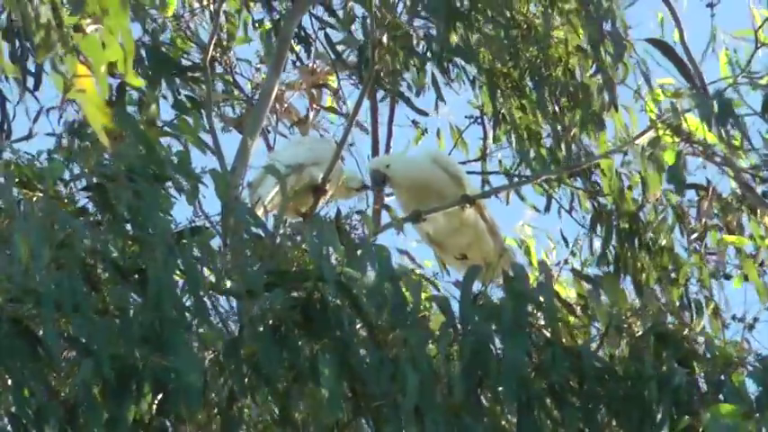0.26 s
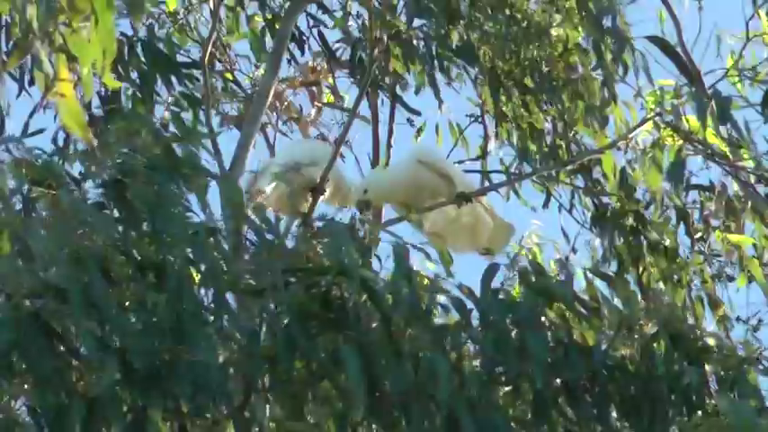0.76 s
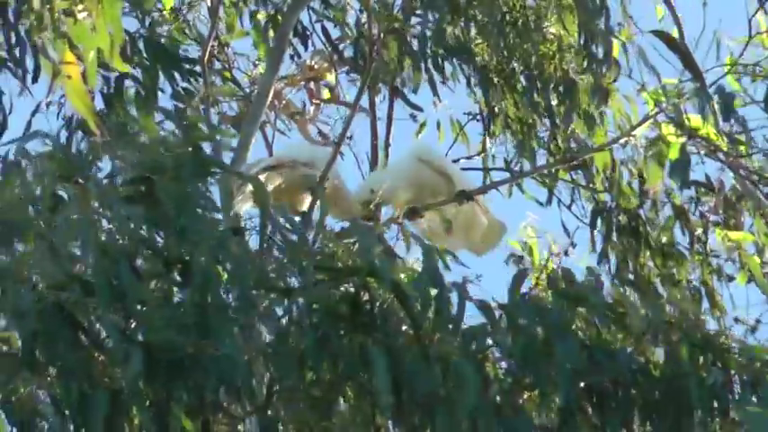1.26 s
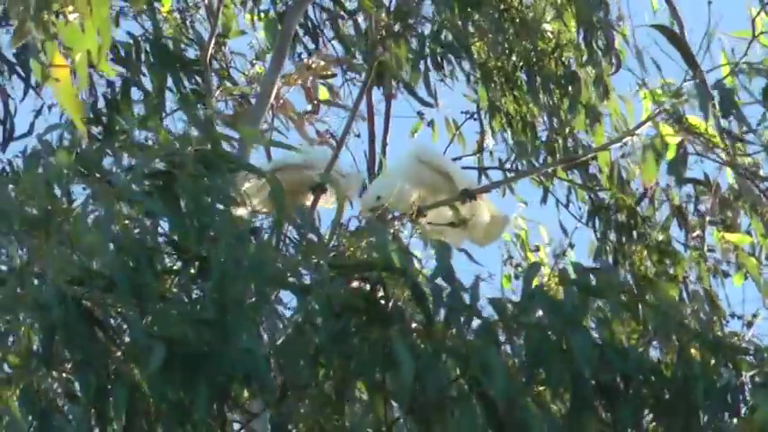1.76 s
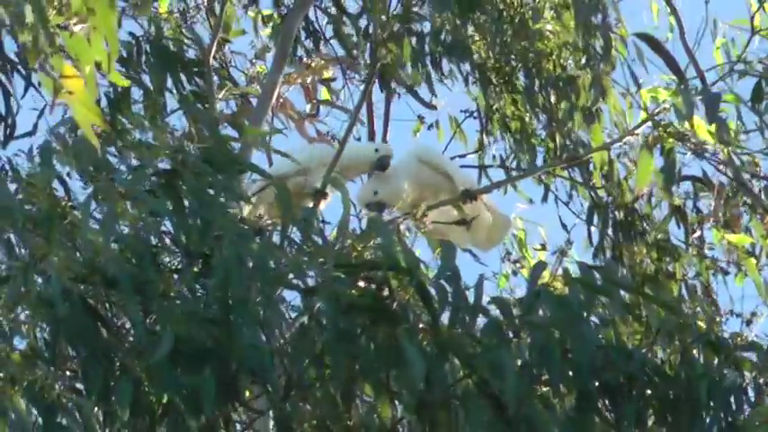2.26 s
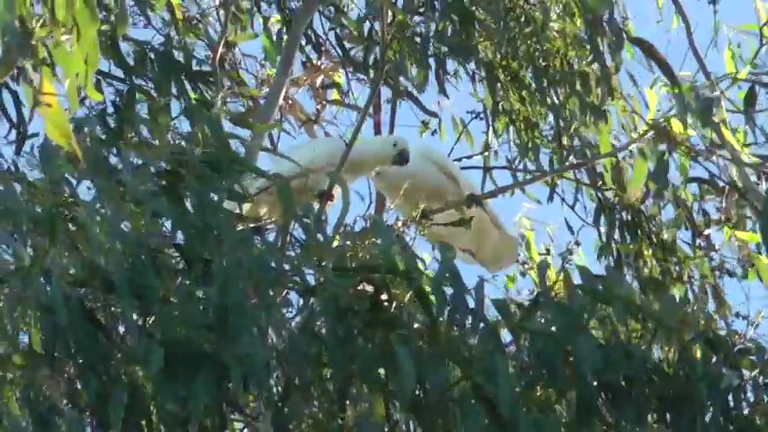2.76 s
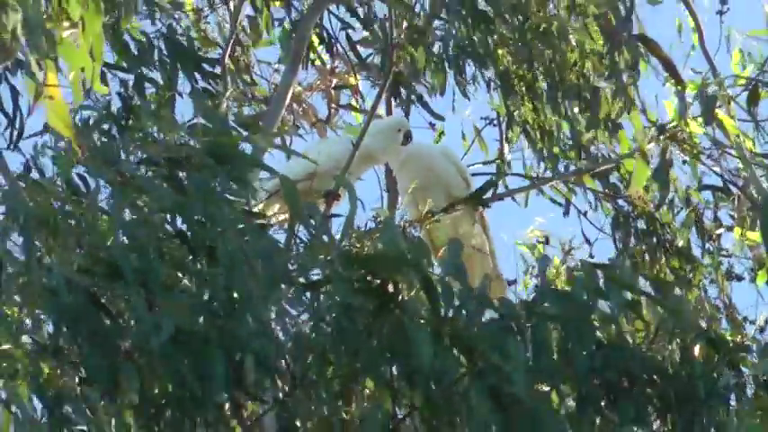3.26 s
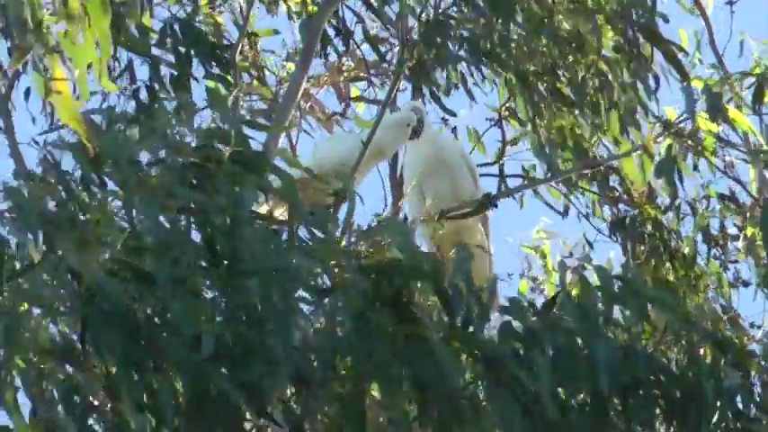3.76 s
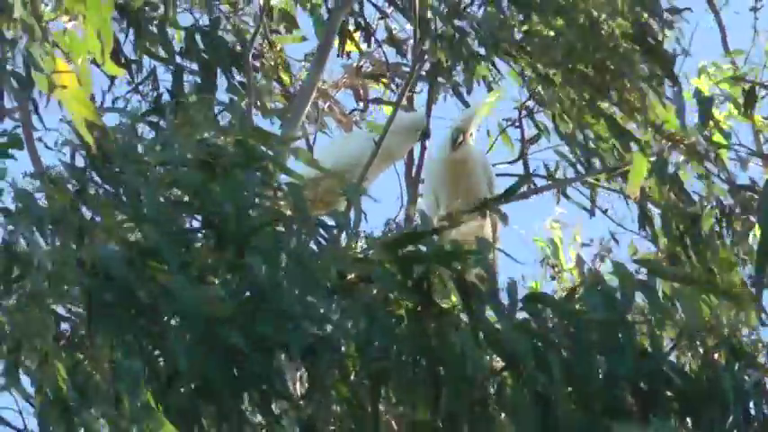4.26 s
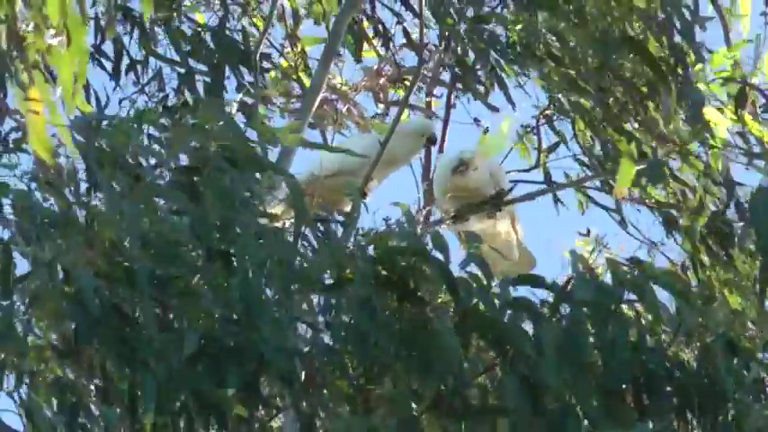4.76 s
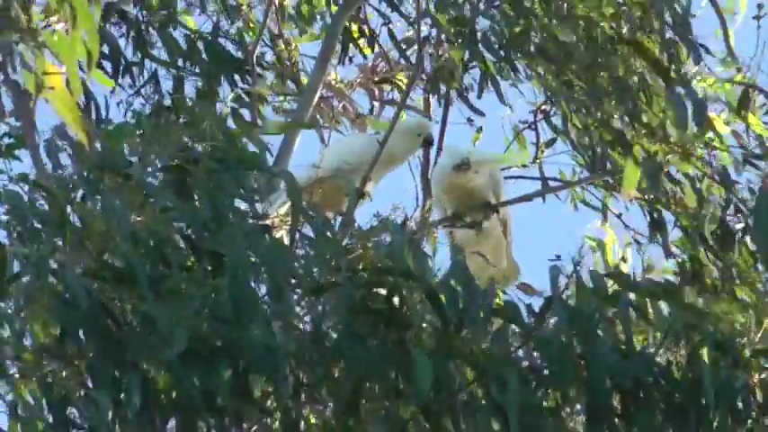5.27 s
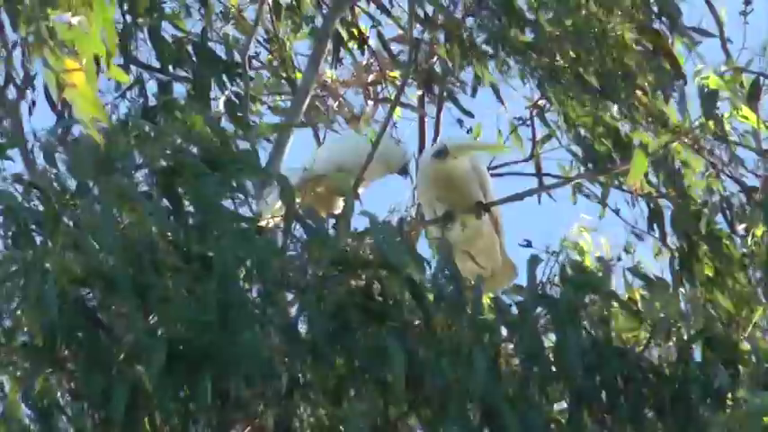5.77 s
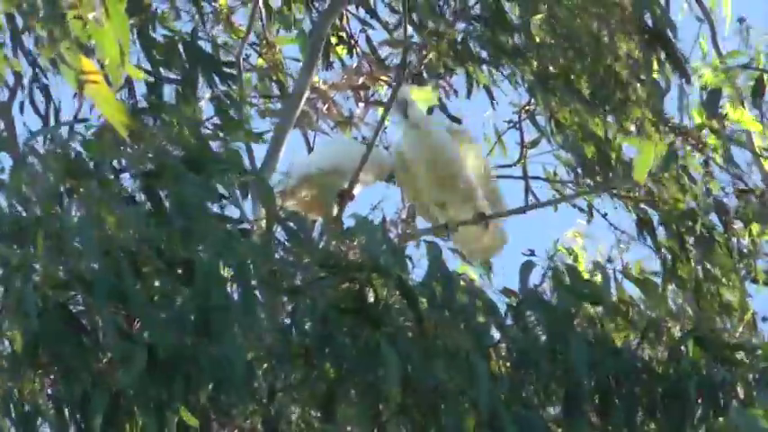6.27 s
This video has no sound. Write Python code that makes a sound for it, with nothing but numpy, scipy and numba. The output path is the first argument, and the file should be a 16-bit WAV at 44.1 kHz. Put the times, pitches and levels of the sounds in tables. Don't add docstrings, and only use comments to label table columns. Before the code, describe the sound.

In a leafy outdoor spot, a cockatoo squeaks softly, then screams raucously five times, with echoing trees, low wind thumps and a far engine.

```python
import sys
import numpy as np
from scipy import signal
from scipy.io import wavfile
from numba import njit

SR = 44100
rng = np.random.default_rng(int(sys.argv[2]) if len(sys.argv) > 2 else 0)


def volts_from_decibels(level):
    exponent = np.asarray(level, float) / 20
    return 10 ** exponent


def digitize_waveform(pressure):
    field = np.atleast_2d(pressure).T
    bounded = np.clip(field, -1, 1)
    quanta = np.round(bounded * 32767).astype(np.int16)
    wavfile.write(sys.argv[1], SR, quanta)


N = 287190

# (start [s], swell [s], let go [s], full effort [dB], sag over the hold [dB])
SCREECHES = [
    (2.28, 0.17, 2.692, -17, -1.5),
    (2.91, 0.096, 3.35, -15.5, 0.24),
    (3.63, 0.086, 4.094, -16.5, -1.44),
    (4.958, 0.11, 5.665, -18.0, 1.7),
    (5.895, 0.091, 6.438, -19, 3),
]
# (windpipe [Hz], windpipe ceiling [dB], beak brightness [dB], brightening [dB/s], beak opening [share/s])
VOICES = [(756, -37.5, -17.5, 25, -0.014), (813, -40, -13.5, 9, 0.015), (827, -39.5, -13, 6.5, 0.12),
          (824, -41, -13, 1.5, 0.022), (822, -38.5, -11.5, 1, 0.019)]
# (centre [Hz], width [Hz], level [dB])
THROAT_FIRST = [(1110, 140, -23.5), (1420, 94, -27), (1810, 162, 0), (2364, 240, 1.5), (3150, 260, -7),
                (3670, 310, -14), (4310, 320, 2), (4990, 180, 1.5), (5250, 210, -7), (5680, 200, 0),
                (6530, 630, -11), (7850, 790, -19), (9550, 1800, -24.5)]
THROAT_LOUD = [(1050, 160, -23), (1350, 106, -29.5), (1931, 187, 0.5), (2498, 320, -2), (3180, 340, -10.5),
               (3370, 396, -8), (4380, 860, -5), (4870, 390, 0.5), (5400, 300, -5), (6044, 160, 0.5),
               (6600, 280, -9), (7550, 490, -12), (9000, 1040, -17), (9780, 2500, -25.5)]
THROAT_LATE = [(1102, 70, -19), (1363, 180, -27), (1911, 256, -2.5), (2550, 370, -9.5), (3160, 150, -12),
               (3463, 243, -12), (4110, 235, 0.5), (4570, 240, 1.5), (5114, 490, 0), (5930, 350, -8),
               (6540, 210, -5), (6770, 100, -8.5), (7560, 660, -9.5), (9300, 200, -17), (10100, 300, -20),
               (11500, 1700, -34)]
THROAT_RASP = [(1990, 200, -6.5), (2440, 440, -5), (3300, 300, -2), (3640, 200, -13), (4860, 1200, 0)]
THROAT_CLICK = [(1360, 66, -12), (1763, 52, -4), (2615, 160, 5), (3240, 360, -6.5), (4400, 930, 0)]
ONSET_DB, KNEE_SHARE, KNEE_DB_PER_S = -25, 0.33, -64
RELEASE_S, RELEASE_DB = 0.066, -23.5
EFFORT_WAVER_DB, WAVER_PER_S = 0.6, 9.0
PIPE_UNDER_DB, PIPE_WAVER_DB, PIPE_HZ_PER_DB, PIPE_WAVER_HZ = -17.5, 1, 4.5, 19.3
BEAK_WAVER_DB, GAPE_WAVER, FLUTTER, FLUTTER_WAVER = 0.9, 0.016, 0.4, 0.2

# (time [s], effort [dB])
RASP_EFFORT = [(1.12, -60), (1.2, -54), (1.3, -47.5), (1.38, -42.5), (1.44, -36.5), (1.475, -41)]
RASP_VOICE = (800, -63, 0.5, -45.0, 0.0)
CLICK_VOICE = (814, -68, -15, 0.0, 0.0)
# (time [s], peak [dB], drop [dB], length [s])
CLICKS = [
    (1.531, -28, 13.5, 0.037),
    (1.899, -25.5, 12, 0.082),
]
CLICK_RISE_S, CLICK_DROP_S = 0.0085, 0.019
# (time [s], pitch [Hz], level [dB])
SQUEAK_LOW = [(1.455, 890, -45), (1.468, 905, -39), (1.495, 936, -38), (1.522, 937, -38.5),
              (1.53, 945, -50)]
SQUEAK_HIGH = [(1.7, 1130, -55), (1.73, 1140, -50), (1.765, 1175, -43), (1.8, 1220, -39), (1.85, 1255, -36),
               (1.885, 1270, -34), (1.905, 1285, -32), (1.92, 1285, -44)]
# (multiple [1], level [dB])
SQUEAK_LOW_TONES = [(2, -12), (3, 0), (4, -5), (5, -20)]
SQUEAK_HIGH_TONES = [(1, -8), (2, 4.5), (3, 1.5), (4, 1.5), (5, -3), (6, -14), (7, -24)]
# (start [s], length [s], first pitch [Hz], last pitch [Hz],
# top [dB])
WHISTLES = [
    (0.09, 0.08, 6900, 6850, -67),
    (0.567, 0.2, 5050, 4880, -61),
    (1.104, 0.12, 3153, 3210, -48.5),
    (1.18, 0.204, 781, 811, -56.5),
    (1.219, 0.118, 3090, 3230, -46.5),
    (1.334, 0.1, 3250, 3300, -45.5),
]
WHISTLE_EDGE_DB = -9

# (delay [s], left gain
ECHOES = [(.0026, 0.15, 0.1), (.0036, 0.17, 0.24), (.0055, .1, .1), (.00714, 0.5, 0.56),
          (0.0127, 0.1, 0.16), (.0157, .08, .12), (.0213, 0.16, 0.09)]
# (frequency [Hz], T60 [s])
TREES_T60 = [(600, 0.2), (1600, 1.02), (2600, 1.215), (4000, 0.86), (8000, 0.59), (14000, 1.1)]
# (frequency [Hz], level [dB])
TREES_COLOUR = [(500, 14.5), (1300, -0.5), (1900, -5), (4000, 3.5), (8000, 4.5), (15000, -3.5)]
RASP_ENDS_S, SOFT_ENDS_S, TURN_S = 1.65, 2.25, 4.7
ASIDE_RASP_DB, ASIDE_SOFT_DB, ASIDE_LOUD_DB, ASIDE_LATE_DB = 3.0, 6.5, 2.7, 0.1

# (peak time [s], peak [dB], rise [dB/s], fall [dB/s])
RUSTLE = [(0.3, -60, 500, 150), (0.34, -51, 900, 70), (0.62, -65, 54.5, 25), (0.97, -65, 800, 119),
          (1.244, -53.5, 116, 54), (1.414, -54, 400, 56), (1.62, -59, 300, 17), (1.888, -58, 60.5, 90),
          (2.212, -61, 305, 52.5), (4.5, -60.5, 70, 15), (5.9, -61.5, 1, 138)]
# (frequency [Hz], density [dB/Hz])
RUSTLE_COLOUR = [(1180, -34), (2000, -4.5), (3550, -12.5), (3640, -8), (4360, -4.5), (6520, -8),
                 (13300, -22.5), (15500, -34)]
BREEZE_DB = -75.5
# (time [s], peak [dB], pitch [Hz], T60 [s], left minus right [dB])
BUMPS = [(2.159, -51, 50, 0.067, -2), (2.549, -47, 66.5, 0.062, 1), (2.688, -53, 51.1, 0.08, -1),
         (3.26, -44.5, 52, 0.058, -6.0), (3.579, -45, 99.5, 0.21, 6), (3.614, -44.5, 105, 0.068, -21),
         (4.037, -48, 110, 0.098, 9), (4.097, -48, 111, 0.077, -11), (4.982, -39, 96, 0.062, 6),
         (5.753, -44, 74, 0.095, -11), (6.111, -38, 57, 0.066, -11), (6.3, -45, 73.6, 0.058, -17)]

# (frequency [Hz], density [dB/Hz])
AIR_COLOUR = [(88, -41), (150, -5.5), (285, -2.5), (339, -0.5), (429, -2), (632, -5.5), (739, 0.5),
              (989, -7), (1990, -6), (3300, -8.5), (3930, -21), (4870, -8.5), (6920, -18), (8730, -24.5),
              (15600, -26)]
AIR_DB, TRAFFIC_TOP_HZ = -49.5, 710
# (peak time [s], peak [dB], rise [dB/s], fall [dB/s])
TRAFFIC = [
    (0.3, 1.5, 0.3, -7),
    (3.15, 2.5, 2.5, 18),
    (3.77, 4.5, 18, 27),
    (6.1, 3.5, 1.5, -1),
]
# (peak time [s], peak [dB], rise [dB/s], fall [dB/s])
ENGINE_DRONE = [
    (4.7, -55, 7, 25),
    (6.5, -47, 8.3, 6),
]
# (peak time [s], peak [dB], rise [dB/s], fall [dB/s])
ENGINE_OCTAVE = [
    (4.3, -57, 108, 7),
]
ENGINE_HZ, ENGINE_IDLE_DB, LABOUR_ENDS_S = 76.6, -62, 4.95
INSECTS_HZ, INSECTS_WIDTH_HZ, INSECTS_DB = 3817, 380, -58
# (peak time [s], peak [dB], rise [dB/s], fall [dB/s])
WIND = [(1.47, -60, 30, 16), (2.45, -55, 8, 12), (3.12, -55, 14, 28), (3.75, -55, 15, 9),
        (5.06, -55, 19, 25), (5.73, -56, 12, 5), (6.24, -49.5, 22, 30)]
CALM_DB = -63
# (frequency [Hz], left-right likeness [1])
LIKENESS = [(90, .1), (130, 0.83), (290, 0.39), (640, 0.71), (1400, 0.74), (3100, 0.89), (6800, 1),
            (10000, 0.28), (15000, .999)]


def screeches():
    out = np.zeros(N)
    throats = [THROAT_FIRST, THROAT_LOUD, THROAT_LOUD, THROAT_LATE, THROAT_LATE]
    for (s, swell_s, end_s, full_db, sag_db), voice, throat in zip(SCREECHES, VOICES, throats):
        held_db = full_db - sag_db
        effort = [(s, full_db + ONSET_DB),
                  (s + KNEE_SHARE * swell_s, full_db + KNEE_DB_PER_S * swell_s),
                  (s + swell_s, full_db),
                  (end_s, held_db),
                  (end_s + RELEASE_S, held_db + RELEASE_DB)]
        harsh(out, voiced(effort, voice, FLUTTER, waver=1), throat)
    return out


def soft_calls():
    out = np.zeros(N)
    harsh(out, voiced(RASP_EFFORT, RASP_VOICE, 0.15, waver=0.56), THROAT_RASP)
    for s, db, drop_db, length_s in CLICKS:
        effort = [(s - CLICK_RISE_S, db - 11), (s, db), (s + CLICK_DROP_S, db - drop_db), (s + length_s, db - 8.5)]
        harsh(out, voiced(effort, CLICK_VOICE, 0.05, waver=0), THROAT_CLICK)
    squeak(out, SQUEAK_LOW, SQUEAK_LOW_TONES, push_db=0)
    squeak(out, SQUEAK_HIGH, SQUEAK_HIGH_TONES, wobble=0.006, push_db=6.5)
    for s, length_s, first_hz, last_hz, db in WHISTLES:
        rows = [(s, first_hz, db + WHISTLE_EDGE_DB),
                (s + length_s / 2, (first_hz + last_hz) / 2, db),
                (s + length_s, last_hz, db + WHISTLE_EDGE_DB)]
        squeak(out, rows, [(1, 0)], wobble=0.025, push_db=-0.5)
    return out


def voiced(effort, voice, flutter, waver):
    s, db = np.transpose(effort)
    pipe_hz, ceiling_db, bright_db, brighten_db_per_s, opening_per_s = voice
    t = np.union1d(np.arange(s[0], s[-1], 0.01), s)
    into_s = t - s[0]
    chance = [waver * drift(WAVER_PER_S, SR)[(into_s * SR).astype(int)] for k in range(6)]
    effort_db = np.interp(t, s, db)
    pipe_db = np.minimum(PIPE_UNDER_DB, ceiling_db - effort_db) + PIPE_WAVER_DB * chance[0]
    pipe_hz = pipe_hz + PIPE_HZ_PER_DB * (effort_db - db.max()).clip(-12) + PIPE_WAVER_HZ * chance[2]
    return np.transpose([t,
                         effort_db + EFFORT_WAVER_DB * chance[1],
                         pipe_hz,
                         pipe_db,
                         bright_db + brighten_db_per_s * into_s + BEAK_WAVER_DB * chance[3],
                         flutter + FLUTTER_WAVER * chance[4],
                         1 + opening_per_s * into_s + GAPE_WAVER * chance[5]])


def harsh(out, rows, throat):
    slap_hz, jitter, flutter_hz, breath, split_hz = 1250, 0.35, 138, 0.24, 3950
    start, (effort_db, pipe_hz, pipe_db, bright_db, flutter, opening) = span(rows)
    size = len(effort_db)
    slap_rate = (1 + jitter * drift(700, size)).clip(0)
    slaps = np.diff(np.floor(np.cumsum(slap_hz / SR * slap_rate)), prepend=0)
    turn = np.cumsum(flutter_hz / SR * (1 + 0.1 * drift(25, size))) % 1
    bursts = 1 - flutter.clip(0, 1) * (1 - 2.2 * np.exp(-3.0 * turn))
    source = (rms_one(slaps - slaps.mean()) + breath * rng.standard_normal(size)) * bursts

    gape = (opening / np.median(opening)) ** 1.24
    body, beak = 0, 0
    for k, (hz, width_hz, db) in enumerate(throat):
        gain = (-1) ** k * volts_from_decibels(db + 1.3 * drift(13, size))
        centre_hz = hz * gape if hz > 2200 else hz
        ring = gain * twice(source, centre_hz, 1.62 * width_hz)
        if hz < split_hz:
            body = body + ring
        else:
            beak = beak + ring
    pipe = twice(source, pipe_hz, 60.5)
    pipe = pipe + 0.52 * twice(source, 0.88 * pipe_hz, 60.0)
    pipe = pipe + 0.24 * twice(source, 0.72 * pipe_hz, 65.0)
    voice = rms_one(body) + volts_from_decibels(pipe_db) * rms_one(pipe) + volts_from_decibels(bright_db) * rms_one(beak)
    add(out, start, volts_from_decibels(effort_db - 3.5) * voice)


def squeak(out, rows, tones, wobble=0.0043, push_db=2.0):
    start, (hz, level_db) = span(rows)
    size = len(hz)
    phase = 2 * np.pi * np.cumsum(hz * (1 + wobble * drift(104, size))) / SR
    push = np.minimum(np.linspace(-1.5, 1.5, size), 0)
    wave = 0
    for k, db in tones:
        tone_db = db + push_db * (k - 3) * push + 1.5 * drift(30, size)
        wave = wave + volts_from_decibels(tone_db) * np.sin(k * phase)
    add(out, start, volts_from_decibels(level_db) * rms_one(wave))


def woods(x):
    tail_db, dull_hz, right_share, right_hz = -57, 5000, 0.26, 3000
    dull = signal.lfilter(*signal.butter(1, dull_hz, fs=SR), x)
    out = x + right_share * signal.lfilter(*signal.butter(2, right_hz, fs=SR), x) * [[-1], [1]]
    for delay_s, left, right in ECHOES:
        lag = round(delay_s * SR)
        out[:, lag:] += dull[:-lag] * [[left], [right]]
    t = np.arange(N) / SR
    aside_db = np.select([t < RASP_ENDS_S, t < SOFT_ENDS_S, t < TURN_S],
                         [ASIDE_RASP_DB, ASIDE_SOFT_DB, ASIDE_LOUD_DB], ASIDE_LATE_DB)
    scatter = banded_noise(TREES_COLOUR, 0, decay=TREES_T60)
    scatter *= 1 - np.exp(-np.arange(scatter.shape[1]) / SR / 0.0012)
    tail = signal.oaconvolve((x * volts_from_decibels(aside_db))[None], scatter, axes=1)[:, :N]
    return out + volts_from_decibels(tail_db) * tail


def leaves():
    gain = volts_from_decibels(BREEZE_DB) + volts_from_decibels(swells(RUSTLE, -90) + 5.5)
    grain = volts_from_decibels(2.0 * drift(150, N))
    return gain * grain * banded_noise(RUSTLE_COLOUR, 1.2, per_octave=2)


def bumps():
    out, t = np.zeros((2, N)), np.arange(SR // 3) / SR
    contact = 1 - np.exp(-t / 0.0046)
    for s, db, hz, t60_s, pan_db in BUMPS:
        ring = volts_from_decibels(db + 14.0 - 60 * t / t60_s) * contact * np.sin(2 * np.pi * hz * t)
        both = ring * volts_from_decibels(np.array([[pan_db / 2], [-pan_db / 2]]))
        at = int(s * SR)
        out[:, at:at + len(t)] += both[:, :N - at]
    return out


def wind():
    low = signal.butter(2, 95, fs=SR, output="sos")
    high = signal.butter(1, 22, "high", fs=SR, output="sos")
    noise = rms_one(signal.sosfilt(np.vstack([low, high]), rng.standard_normal((2, N))))
    lumps = volts_from_decibels(4.1 * np.array([drift(5.9, N), drift(11, N)]) + [[-1.5], [1.5]])
    return volts_from_decibels(swells(WIND, CALM_DB)) * lumps * noise


def insects():
    band = twice(rng.standard_normal(N), INSECTS_HZ, INSECTS_WIDTH_HZ)
    return volts_from_decibels(INSECTS_DB + 1.4 * drift(2.2, N)) * rms_one(band)


def engine():
    level_db = swells(ENGINE_DRONE, ENGINE_IDLE_DB) + 1.4 * drift(8.7, N)
    octave_db = swells(ENGINE_OCTAVE, -70) - 100 * (np.arange(N) / SR - LABOUR_ENDS_S).clip(0)
    phase = 2 * np.pi * np.cumsum(ENGINE_HZ * (1 + 0.0077 * drift(2.1, N))) / SR
    return volts_from_decibels(level_db) * np.sin(phase) + volts_from_decibels(octave_db) * np.sin(2 * phase)


def air_and_traffic():
    air = volts_from_decibels(AIR_DB) * banded_noise(AIR_COLOUR, 0.4)
    traffic = signal.lfilter(*signal.butter(1, TRAFFIC_TOP_HZ, fs=SR), air)
    return air + (volts_from_decibels(swells(TRAFFIC, -2.5)) - 1) * traffic


def banded_noise(spectrum, patchy_db, decay=None, per_octave=2.5):
    size = N if decay is None else 5 * SR // 4
    white = rng.standard_normal((2, 2, size))
    low, high = spectrum[0][0], 1.1 * spectrum[-1][0]
    edges = np.geomspace(low, high, round(per_octave * np.log2(high / low)))
    flicker = [volts_from_decibels(patchy_db * drift(16, size)) for k in range(3)]
    out = 0
    for k, (low, high) in enumerate(zip(edges, edges[1:])):
        band = signal.butter(2, [low, high], "band", fs=SR, output="sos")
        mid, side = signal.sosfilt(band, white[k % 2])
        hz = np.sqrt(low * high)
        alike = np.clip(at_hz(LIKENESS, hz), -1, 1)
        gain = volts_from_decibels(at_hz(spectrum, hz)) * np.roll(flicker[k % 3], 5000 * k)
        if decay is not None:
            gain = gain * volts_from_decibels(-60 * np.arange(size) / SR / at_hz(decay, hz))
        out = out + np.array([np.sqrt(1 + alike) * gain * mid, np.sqrt(1 - alike) * gain * side])
    return rms_one(np.array([out[0] + out[1], out[0] - out[1]]))


def swells(rows, floor_db):
    t = np.arange(N) / SR
    peaks = [db - np.maximum(abs(rise) * (s - t), abs(fall) * (t - s)) for s, db, rise, fall in rows]
    return np.maximum(np.max(peaks, axis=0), floor_db)


def drift(rate_hz, size):
    r = np.exp(-16 * np.pi * rate_hz / SR)
    slow = signal.lfilter([1], [1, -2 * r, r * r], rng.standard_normal(size // 8 + 3002))[3000:]
    return np.interp(np.arange(size) / 8, np.arange(len(slow)), rms_one(slow))


@njit
def gliding(x, turn, r):
    out = np.zeros(len(x))
    for i in range(2, len(x)):
        out[i] = (1 - r * r) / 2 * (x[i] - x[i - 2]) + 2 * r * turn[i] * out[i - 1] - r * r * out[i - 2]
    return out


def twice(x, hz, width_hz):
    turn = np.cos(2 * np.pi * hz / SR) + 0 * x
    r = np.exp(-np.pi * width_hz / SR)
    return gliding(gliding(x, turn, r), turn, r)


def span(rows):
    s, *columns = np.transpose(rows)
    start = max(int(s[0] * SR), 0)
    t = np.arange(start, min(int(s[-1] * SR) + 1, N)) / SR
    return start, [np.interp(t, s, c) for c in columns]


def add(out, start, x, fade_s=0.0098):
    k = np.arange(len(x))
    out[start:start + len(x)] += x * np.clip(np.minimum(k, k[::-1]) / (fade_s * SR), 0, 1)


def at_hz(points, hz):
    points = np.array(points)
    return np.interp(np.log(hz), np.log(points[:, 0]), points[:, 1])


def rms_one(x):
    return x / np.sqrt(np.mean(x ** 2) + 1e-20)


def scene():
    calls = woods(screeches() + soft_calls())
    background = air_and_traffic() + engine() + insects() + wind()
    return calls + leaves() + bumps() + background


def roll_off(x):
    return signal.sosfilt(signal.butter(12, 15800, fs=SR, output="sos"), x)


def record(dry):
    mid, side = (dry[0] + dry[1]) / 2, (dry[0] - dry[1]) / 2
    side = signal.sosfiltfilt(signal.butter(4, 9000, fs=SR, output="sos"), side)
    top_cut = signal.cheby2(12, 70, 15900, fs=SR, output="sos")
    cut = signal.sosfilt(top_cut, [mid + side, mid - side])
    return roll_off(cut)


dry = scene()
out = record(dry)
digitize_waveform(out)
```